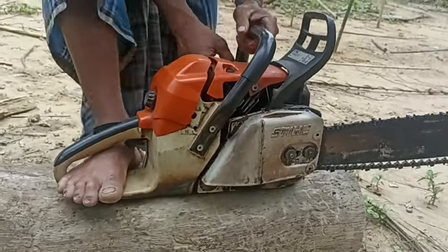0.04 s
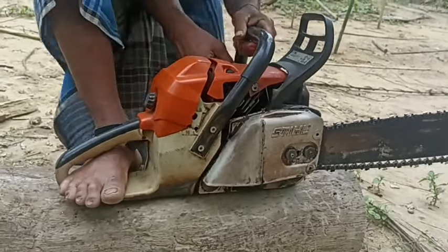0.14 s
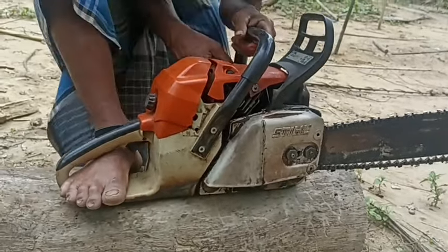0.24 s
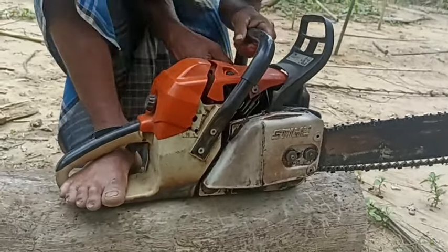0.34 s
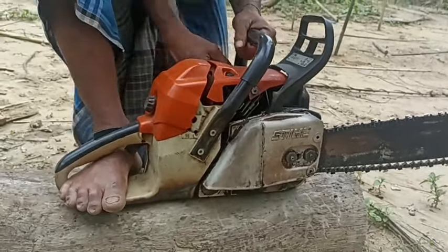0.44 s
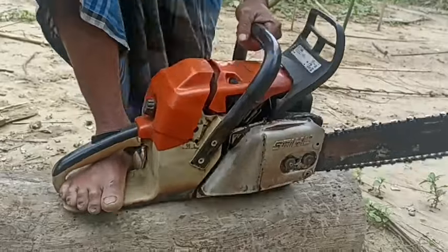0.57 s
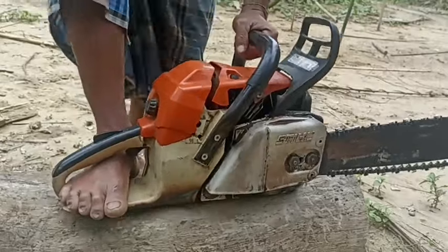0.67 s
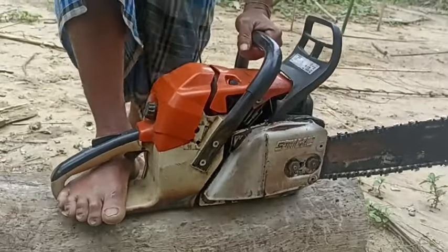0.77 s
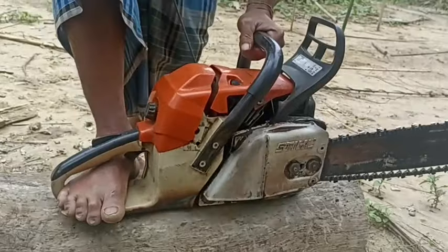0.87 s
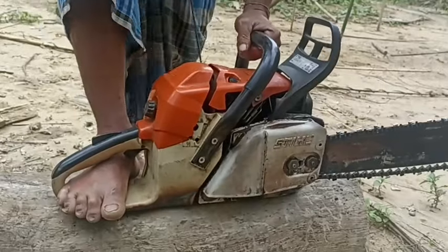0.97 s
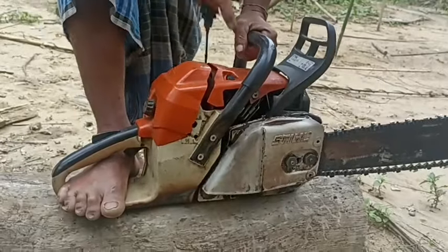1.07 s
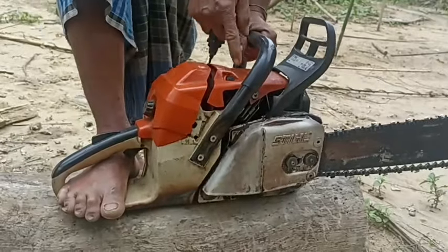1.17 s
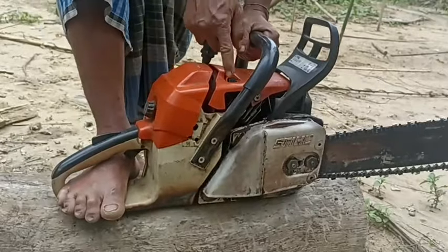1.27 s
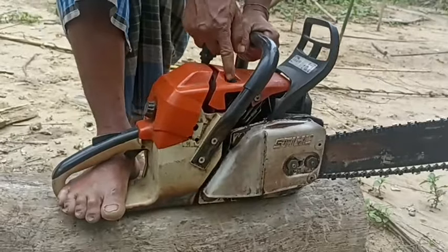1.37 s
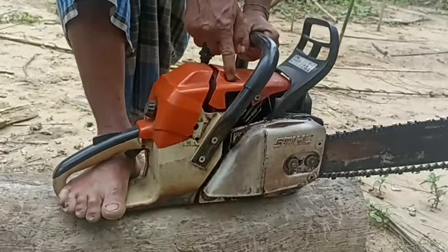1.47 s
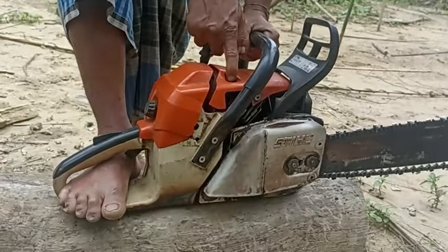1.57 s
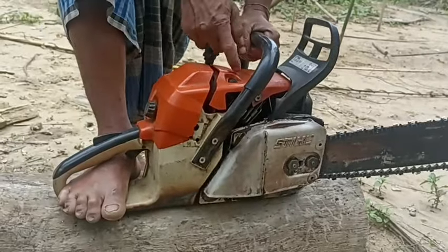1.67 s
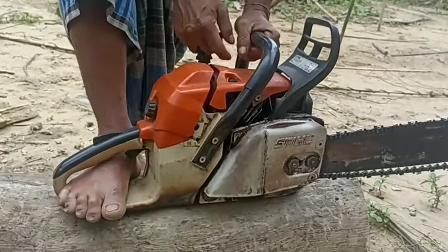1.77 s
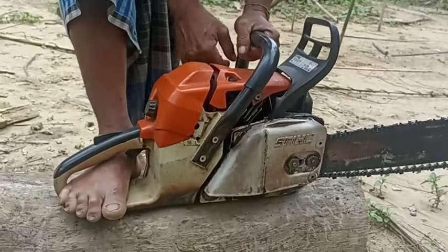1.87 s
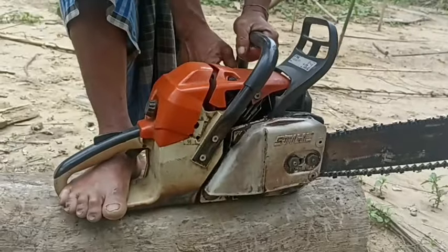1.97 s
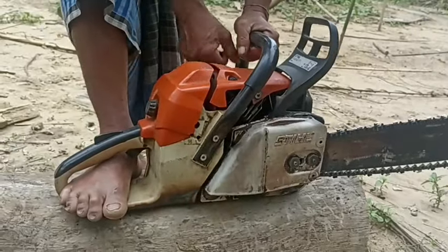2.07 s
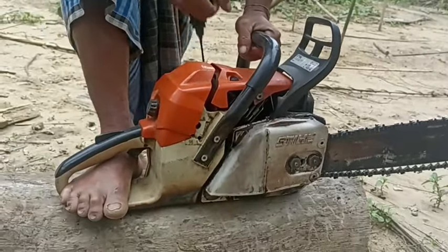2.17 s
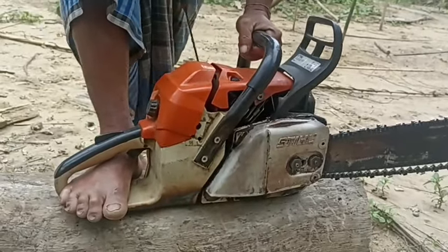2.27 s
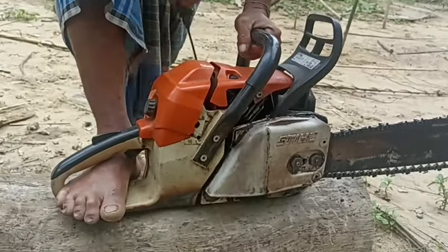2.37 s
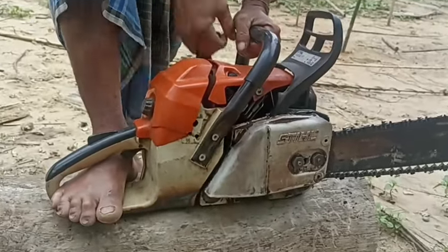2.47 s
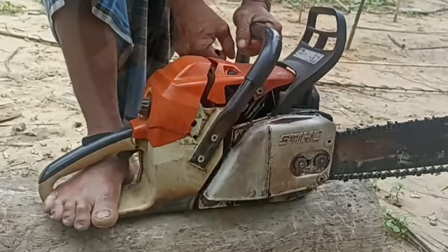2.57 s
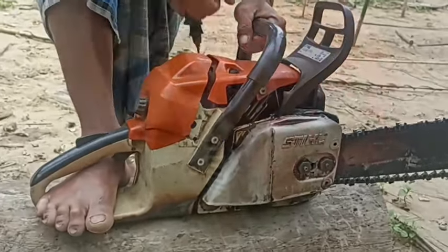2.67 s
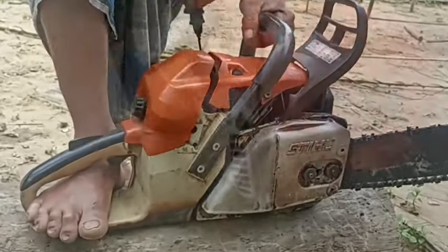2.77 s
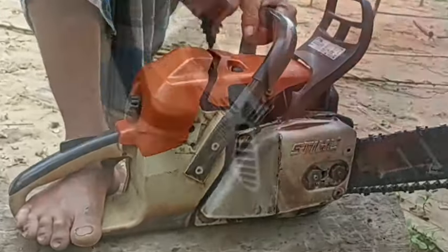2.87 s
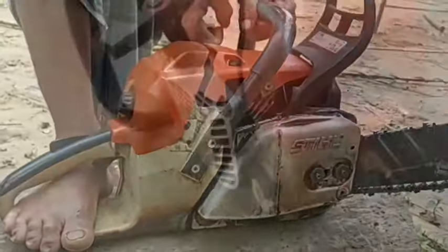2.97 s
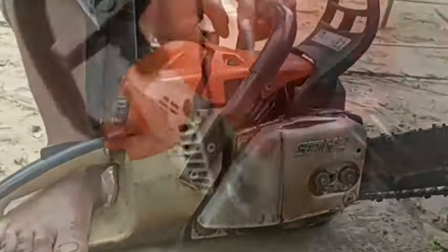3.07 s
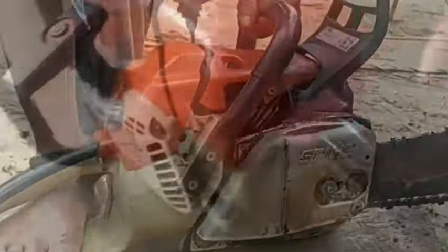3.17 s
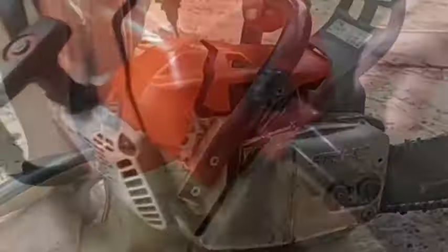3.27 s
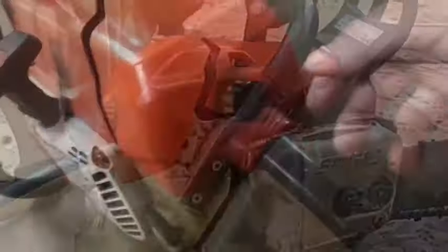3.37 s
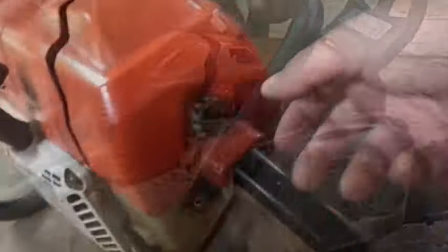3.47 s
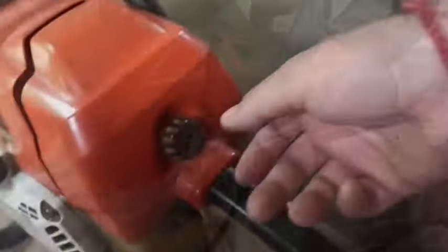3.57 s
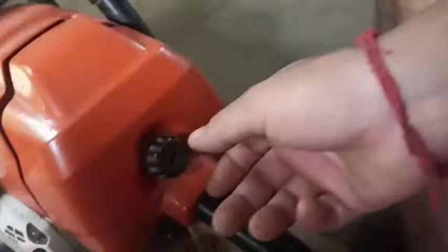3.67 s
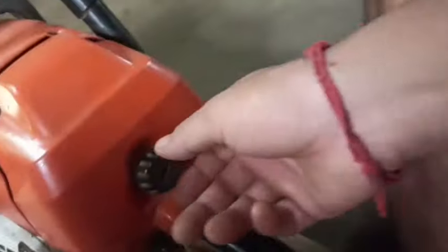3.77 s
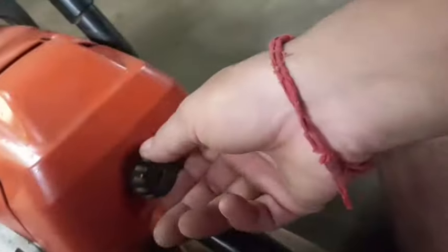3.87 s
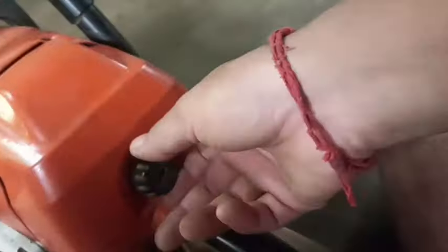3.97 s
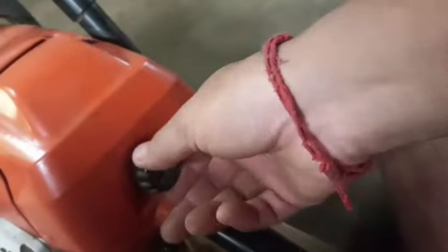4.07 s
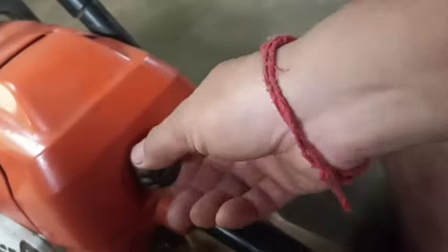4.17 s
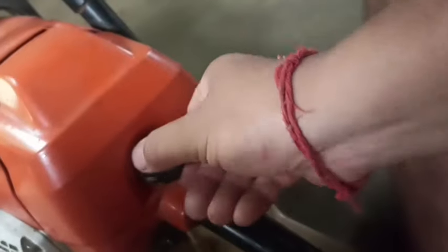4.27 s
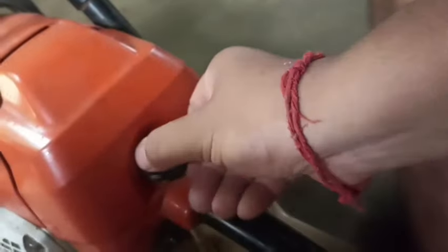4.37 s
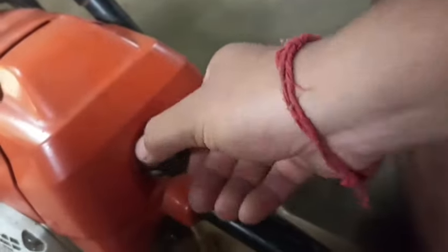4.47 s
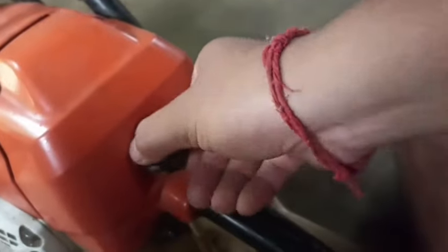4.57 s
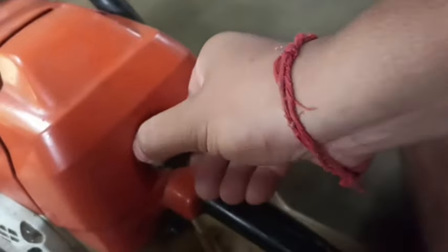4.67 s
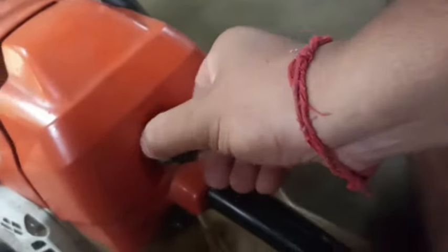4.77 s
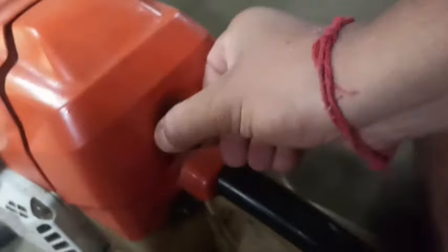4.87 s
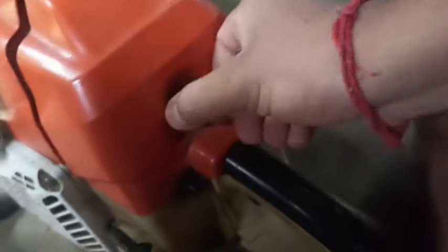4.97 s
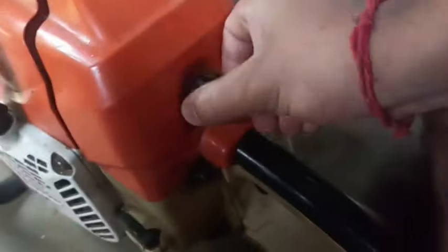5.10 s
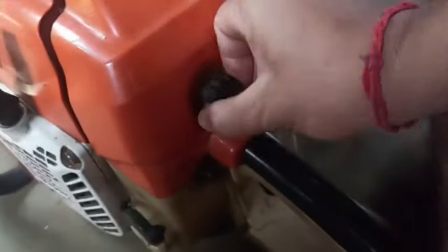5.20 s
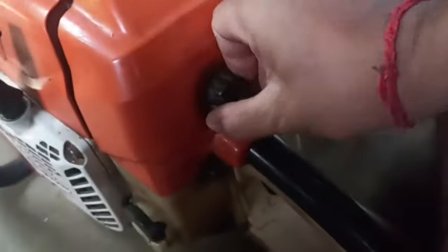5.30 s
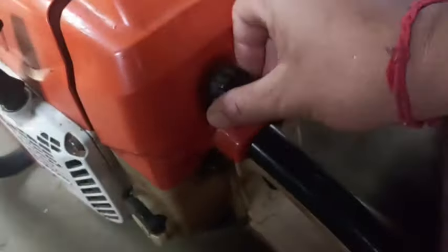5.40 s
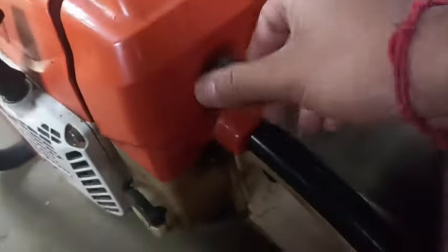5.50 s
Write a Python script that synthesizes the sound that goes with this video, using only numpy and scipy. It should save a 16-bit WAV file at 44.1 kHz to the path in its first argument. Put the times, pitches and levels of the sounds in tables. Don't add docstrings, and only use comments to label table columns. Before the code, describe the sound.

A cold chainsaw's starter rope is yanked outdoors, giving a rasp and hollow chuffs that slow and die, then clacks and faint close knob taps.

```python
import sys
import numpy as np
from scipy import signal
from scipy.fft import rfft, irfft, next_fast_len
from scipy.io import wavfile
from scipy.ndimage import map_coordinates

SR = 44100
rng = np.random.default_rng(int(sys.argv[2]) if len(sys.argv) > 2 else 0)


def waveform_to_disk(signal):
    frames = np.transpose(np.atleast_2d(signal))
    scaled = np.clip(frames, -1, 1) * 32767
    samples = np.round(scaled).astype(np.int16)
    wavfile.write(sys.argv[1], SR, samples)


def natural_amplitude(level_db):
    exponent = np.asarray(level_db, float) / 20
    return 10 ** exponent


N = 244314
T = np.arange(N) / SR

# f/Hz, width/Hz, level/dB
CASING = [(991.6, 110, 4), (1062.4, 28, 4.5), (1146, 110, 2.5), (1556, 120, 7), (1764, 200, 1.5)]
HOLLOW = [(254.2, 57, -1.5), (393, 127, -0.5), (636, 63, -2.5)]
# t/s, level/dB, hardness/dB
PATS = [
    (3.96, -64, -3),
    (4.2245, -55.5, -1.5),
]
# f/Hz, likeness/share
ALIKE = [(100, 0.6), (500, 1), (1400, 0.55), (3000, 0.74), (6000, 0.14), (15000, 0.21)]


def along(points, hz):
    f, v = np.transpose(points)
    return np.interp(np.log(hz + 1), np.log(f + 1), v)


def curves(rows):
    s, *cols = np.transpose(rows)
    return [np.interp(T, s, c) for c in cols]


def span(rows, fade):
    return np.clip(np.minimum(T - rows[0][0], rows[-1][0] - T) / fade, 0, 1)


def wobble(rate):
    return map_coordinates(rng.standard_normal(int(N * rate / SR) + 4), [T * rate])


def filtered(x, response):
    m = next_fast_len(N + SR // 2)
    return irfft(rfft(x, m) * response(np.fft.rfftfreq(m, 1 / SR)), m)[..., :N]


def modes(table, plate=True):
    def response(f):
        ring = 0
        for k, (centre, width, db) in enumerate(table):
            sense = (-1) ** (k * plate)
            damping = 1j * f * width
            ring = ring + sense * natural_amplitude(db) * damping / (centre * centre - f * f + damping)
        return ring / (1 + 1j * f / (1.6 * table[-1][0])) ** 2
    return response


def smooth(spectrum):
    return lambda f: natural_amplitude(along(spectrum, f))


def pair(alike):
    def shares(hz):
        turn = np.arccos(np.clip(along(alike, hz), -1, 1)) / 2
        return np.array([np.cos(turn), np.sin(turn)])
    mid, side = filtered(rng.standard_normal((2, N)), shares)
    return np.array([mid + side, mid - side])


def excite(envelope, response, alike):
    size = np.sqrt(np.mean(np.abs(response(np.linspace(0, SR / 2, num=8192))) ** 2))
    return filtered(envelope * pair(alike), response) / size


def engine():
    # t/s, exhaust puff level/dB, transfer puff level/dB, gap between them/ms
    crank_turns = [(0.6975, -1, -11, 5.2), (0.7355, -9.5, -13, 5.1), (0.771, -3, -8.5, 5.1),
                   (0.8053, -3, -8, 4.6), (0.8439, -1.5, -9, 4.7), (0.893, -10, -3, 6.2),
                   (0.9463, -10.5, -5, 6.6), (1.0085, -12.5, -8, 8.8), (1.086, -15, -10, 12),
                   (1.195, -25, -18, 15), (2.2773, -29, -17, 5.6), (2.316, -39.5, -36, 5.6),
                   (2.835, -50, -35.5, 8)]
    # f/Hz, width/Hz, level/dB
    muffler = [(105, 39, -4), (152, 76, -2), (203, 98, -0.5), (213.9, 6.3, 1), (330, 220, -12),
               (464, 110, -1.5), (650, 380, -4.5)]
    intake_share, intake_latest_s = 0.4, 0.038
    brisk_turn_s, slowest_turn_s = 0.078, 0.11
    full_gulp_db, gulp_loss_db_per_s = -17, 558
    puff_s, charge_s, slow_widens_per_s = 0.00055, 0.001, 10.3
    low_cut_hz = 94.3
    flow = np.zeros(N)
    lengths = np.diff([row[0] for row in crank_turns], append=N / SR)
    for (s, db, transfer_db, gap_ms), turn in zip(crank_turns, lengths):
        late = min(intake_share * turn, intake_latest_s)
        slow = max(min(turn, slowest_turn_s) - brisk_turn_s, 0)
        gulp_db = full_gulp_db - gulp_loss_db_per_s * slow + min(max(db, transfer_db) + 5.5, 0)
        exhaust = (s, db, puff_s)
        transfer = (s + gap_ms / 1000, transfer_db, charge_s)
        intake = (s + late, gulp_db, charge_s)
        for at, level_db, width in (exhaust, transfer, intake):
            width = width * (1 + slow_widens_per_s * slow)
            flow += natural_amplitude(level_db) * np.exp(-.5 * ((T - at) / width) ** 2)
    flow *= 1 + 0.25 * wobble(900)
    bass_cut = lambda hz: 1 / (1 + (low_cut_hz / (hz + 1)) ** 4)
    chuffs = filtered(filtered(flow, modes(muffler, plate=False)), bass_cut)
    return natural_amplitude(1.0) * chuffs * np.ones((2, 1))


def starter():
    # t/s, level/dB
    pull = [
        (0.645, -41),
        (0.71, -39),
        (0.748, -40.5),
        (0.765, -31),
        (0.835, -27),
        (0.858, -44),
        (0.921, -44),
        (0.985, -46),
        (1.3, -61.5),
    ]
    # t/s, level/dB
    rewind = [
        (1.35, -56),
        (1.45, -72),
        (2.098, -69),
        (2.356, -47.5),
        (2.414, -66),
        (2.538, -53.5),
        (2.682, -73),
        (2.788, -55.5),
        (2.95, -77.5),
    ]
    # level at a middling rattle/dB, growth with the rattle/ratio
    rattle_bodies = [(-53.5, .9), (-54.5, 1), (-49, 1.05), (-55, 1.2)]
    middling_db = -50
    rows = [*pull, *rewind]
    rattle_db, = curves(rows)
    grain = span(rows, 0.018) * natural_amplitude(0.87 * wobble(130) + 4.2 * wobble(40))
    return grain * natural_amplitude([db + grows * (rattle_db - middling_db) for db, grows in rattle_bodies])


def contacts(kinds, bodies, tail_db, rattle=0):
    # f/Hz, level/dB per Hz
    tick = [(2060, -30), (3500, -4.5), (3850, -11.5), (4240, -4), (7270, -5.5), (7850, -11.5),
            (8580, -11.5), (14900, -10), (16000, -30)]
    ring_share = 0.58
    envelope, t = np.zeros((4, N + SR)), np.arange(SR // 4) / SR
    for (knock_db, ring_db, tick_db, rise_ms, length_ms), events in kinds:
        rise, length = rise_ms / 1000, length_ms / 1000
        decay = np.exp(-(t / length) ** 2) + natural_amplitude(tail_db) * np.exp(-t / (3 * length))
        chatter = (1 - np.exp(-t / rise)) * decay
        for s, db, hard_db in events:
            ring_level_db = ring_db + ring_share * hard_db + 2.5
            tick_level_db = tick_db + hard_db + 2.5
            layers = natural_amplitude(db + np.array([-1, knock_db - 1.0, ring_level_db, tick_level_db]))
            start = round(s * SR)
            envelope[:, start:start + len(t)] += layers[:, None] * chatter
    envelope = (envelope[:, :N] + rattle) * natural_amplitude(3.0 * wobble(1200))
    responses = [*map(modes, bodies), smooth(tick)]
    return sum(excite(e, r, ALIKE) for e, r in zip(envelope, responses))


def starter_knocks():
    # t/s, level/dB, hardness/dB
    rasps = [(0.612, -22.5, 1.5), (0.662, -29, 0), (0.68, -23, 0.5), (0.755, -23, 3), (0.788, -21.5, 7.5),
             (0.823, -20.5, 1), (0.888, -30, -2), (0.947, -36, -5), (0.978, -36, -4), (1.006, -31, -6.5),
             (1.116, -48, -7.5), (1.418, -49, -1), (1.643, -53, 9.5), (2.211, -30.5, -5), (2.319, -43, 3),
             (2.381, -47, -0.5)]
    # t/s, level/dB, hardness/dB
    clacks = [(0.018, -43, 6), (0.525, -47.5, -3), (0.626, -16, 9.5), (0.632, -13, -2.5), (1.627, -31, 5),
              (1.994, -47.5, -7), (2.257, -69, 39), (2.308, -34.5, 7), (2.435, -43, -9), (2.617, -48, -2),
              (2.719, -52, -15), (2.744, -42, 1.5), (2.751, -36, 2.5), (2.764, -21, -8.5),
              (2.859, -49, -13), (3.059, -38.5, -1), (3.253, -34.5, -1), (3.512, -49.5, 2)]
    # t/s, level/dB, hardness/dB
    thuds = [(0.434, -52, -3), (1.335, -43, -7), (2.19, -34, -8), (2.238, -17, -1), (2.355, -17, -4),
             (2.491, -47.5, -10), (2.522, -39.5, 3.5), (2.571, -49.5, 4), (2.821, -41.5, 4),
             (3.17, -59, 0.5), (3.301, -45, 7)]
    # t/s, level/dB, hardness/dB
    pawls = [(0.035, -33.5, -5.5), (0.051, -43.5, -6), (0.925, -22, 3.5), (1.675, -55, 9), (1.971, -51, -1),
             (2.0244, -35.5, -8), (2.037, -47.5, 0), (2.152, -56.5, 5), (2.679, -56, -7), (2.837, -57.5, 7),
             (3.012, -53.5, -3), (3.222, -60, -5)]
    # t/s, level/dB, hardness/dB
    snaps = [(0.252, -62, 10), (0.27, -57, 11), (0.354, -49.5, 0), (2.917, -60, 4), (2.95, -50.5, 0),
             (3.047, -58, 3), (3.348, -67, 5), (3.592, -54.5, -13.5)]
    # t/s, level/dB, hardness/dB
    slaps = [
        (1.08, -30, 1.5),
        (1.185, -33, -0.5),
        (1.25, -47.5, -14),
        (1.278, -59, -2.5),
    ]
    # t/s, level/dB, hardness/dB
    ratchets = [(0.7185, -28, 0), (0.8654, -25, -3)]
    # f/Hz, width/Hz, level/dB
    tank = [(521, 36, 2.5), (732, 140, 1.5)]
    shroud = [(2020, 170, -7), (2501, 91, 1.5), (2930, 160, -8), (3456, 130, -5.5), (4420, 660, -17)]
    kinds = [
        ((-6, -6, -11, 3, 15), rasps),
        ((-15, -10.5, -22.5, 1.64, 8.5), clacks),
        ((-3.5, -15, -23.5, 1, 6.5), thuds),
        ((-15, -0.5, -13, 0.8, 8.5), pawls),
        ((-10, -4.5, -1, 1.15, 3), snaps),
        ((-2, 0.5, -27, 3.5, 9), slaps),
        ((-14.5, -5, 4.5, .5, 7), ratchets),
    ]
    return contacts(kinds, (CASING, tank, shroud), tail_db=-18, rattle=starter())


def lever():
    # f/Hz, level/dB per Hz
    steel = [(1760, -50), (3000, -16), (4170, -12), (5140, -22), (6530, -4), (8110, -18), (9660, -20.5),
             (12200, 0), (15600, -12), (16000, -16)]
    s, db = 1.625, -16.5
    t = np.clip(T - s, 0, None)
    snap = (T > s) * (natural_amplitude(-60 * t / .007) + natural_amplitude(-14.5 - 60 * t / .04) + natural_amplitude(-26.5 - 60 * t / 0.25))
    cover = natural_amplitude(db - 26 - 60 * t / 0.09) * np.sin(2 * np.pi * CASING[1][0] * t)
    left_right_db = np.array([[1.5], [-1.5]])
    return cover + excite(natural_amplitude(db + left_right_db) * snap, smooth(steel), ALIKE)


def knob_flicks():
    # t/s, level/dB, hardness/dB
    flicks = [(3.944, -36.5, -16.5), (4.894, -56.5, -5), (4.908, -31, -8), (4.923, -47.5, 2.5),
              (4.949, -60, 8), (4.956, -58, 10), (3.93, -72, 3)]
    # t/s, level/dB, hardness/dB
    brushes = [(4.346, -63, 1), (4.388, -68.5, -5), (4.449, -70, -2), (4.63, -67, 5), (4.663, -71, 2.5),
               (4.932, -62.5, 3.5)]
    # t/s, level/dB, hardness/dB
    detents = [
        (5.1858, -45, -3),
        (5.2, -70, -3),
    ]
    # t/s, level/dB, hardness/dB
    taps = [
        (4.3365, -36, -10),
        (5.263, -50, 8.5),
        (4.372, -58, 13),
        (5.472, -70, 22),
    ]
    # f/Hz, width/Hz, level/dB
    cover = [(830, 194, 4), (1240, 93.5, 5.5), (1507, 230, 3), (1940, 250.6, -6.5)]
    knob = [(2303, 120, 5.5), (3370, 270, -1), (4120, 140, -3), (5335, 487, -10)]
    kinds = [
        ((-5, -4.5, -18.5, 0.9, 4), flicks),
        ((8, -2.5, -7, 1.5, 4), PATS),
        ((2.5, -2, -10, 4, 25), brushes),
        ((-2, 12, -5.5, 0.17, 3), detents),
        ((-1.5, -1.5, -12, 0.35, 2.13), taps),
    ]
    return contacts(kinds, (cover, HOLLOW, knob), tail_db=-10)


def thumb():
    press_db, press_s = 24, .0005
    push = sum(natural_amplitude(db + press_db) * np.exp(-.5 * ((T - s - .003) / press_s) ** 2) for s, db, _ in PATS)
    return filtered(push, modes(HOLLOW))


def trees(x):
    # f/Hz, t60/s
    decay_times = [(200, 0.39), (1500, 0.24), (6000, 0.16), (14000, 0.1)]
    hz, t, z = signal.stft(rng.standard_normal((2, SR // 2)), SR, nperseg=256)
    fading = z * natural_amplitude(-60 * t / along(decay_times, hz)[:, None])
    tail = signal.istft(fading, SR, nperseg=256)[1]
    return signal.fftconvolve(x, tail / np.linalg.norm(tail[0]), axes=1)[:, :N]


def bird():
    # t/s, length/s, low f/Hz, high f/Hz, level/dB
    hoots = [(2.054, .145, 214, 264, -51), (2.278, .12, 218, 330, -44), (2.379, 0.046, 215.5, 225, -53),
             (2.966, .258, 211.4, 273.3, -56.5), (3.215, 0.063, 207, 208, -64),
             (5.341, 0.049, 190, 195, -63), (5.38, 0.11, 194.6, 192, -61.5), (5.458, .1, 202, 213, -65.5)]
    low_hold_s, glide_s, high_loss_db_per_hz = 0.0243, 0.031, .11
    out = 0
    for s, length, low_hz, high_hz, db in hoots:
        inside = np.minimum(T - s, s + length - T)
        hz = low_hz + (high_hz - low_hz) * np.clip((inside - low_hold_s) / glide_s, 0, 1)
        phase = 2 * np.pi * np.cumsum(hz) / SR
        level_db = db - high_loss_db_per_hz * (hz - low_hz) + 3.5 + 2.0 * wobble(45)
        tone = np.sin(phase) + natural_amplitude(-22.5) * np.sin(2 * phase)
        out += np.clip(inside / 0.0223, 0, 1) ** 2 * natural_amplitude(level_db) * tone
    return out


def air():
    # f/Hz, level/dB per Hz
    rumble = [(12, -60.5), (20, -31), (48, -31.5), (83, -6), (163, -6.5), (202, -6.5), (242, -6),
              (373, -7.5), (642, -15.5), (1500, -27), (1950, -49), (3300, -120)]
    rustle = [(290, -24.5), (500, -1), (585, -4), (876, -6), (1240, -9.5), (1520, -2.5), (2040, -1.5),
              (3810, -13.5), (4500, -17), (5850, -40), (9900, -120)]
    hiss = [(530, -34.5), (900, -8), (1600, -11), (1920, -5.5), (2500, -9.5), (2930, -8.5), (16000, -14.5)]
    # t/s, level/dB
    distant = [(0, -60), (0.6, -61), (1.5, -59.5), (2.1, -59), (2.8, -65), (3.3, -64.5), (4.4, -60.5),
               (5.54, -61.5)]
    # t/s, quietness/share
    falling_back = [(0, 0.015), (1.5, 0.18), (2.7, 0.34), (3.3, .95), (4.4, 1.1), (5.54, 0.91)]
    # f/Hz, likeness/share
    alike_far = [(60, 0.58), (180, 0.87), (550, 0.12), (1650, 0.04), (4970, 0.01), (15000, 0.02)]
    quietness, = curves(falling_back)
    rumble_db, = curves(distant)
    rustle_db = -58 + (-70 + 58) * quietness
    hiss_db = -62.5 + (-70.5 + 62.5) * quietness
    layers = [(rumble_db, rumble, 1.5), (rustle_db, rustle, 1.2), (hiss_db, hiss, .6)]
    return sum(excite(natural_amplitude(db + sway_db * wobble(16)), smooth(colour), alike_far)
               for db, colour, sway_db in layers)


def scene():
    # f/Hz, level gained left and lost right/dB
    shade = [(1000, 0), (4500, -.5), (7500, -2), (15000, 5)]
    lead_s = .0001
    saw = engine() + lever() + thumb()
    saw += starter_knocks()
    saw += knob_flicks()
    side = np.array([[1], [-1]])
    saw = filtered(saw, lambda hz: np.exp(1j * np.pi * hz * lead_s * side) * natural_amplitude(along(shade, hz) * side))
    return saw + natural_amplitude(-26) * trees(saw) + bird() + air()


def band_limit(x):
    return signal.sosfilt(signal.butter(12, 16620, fs=SR, output="sos"), x)


def record(dry):
    top_hz = 16300
    return band_limit(filtered(dry, lambda hz: hz < top_hz))


dry = scene()
out = record(dry)
waveform_to_disk(out)
```